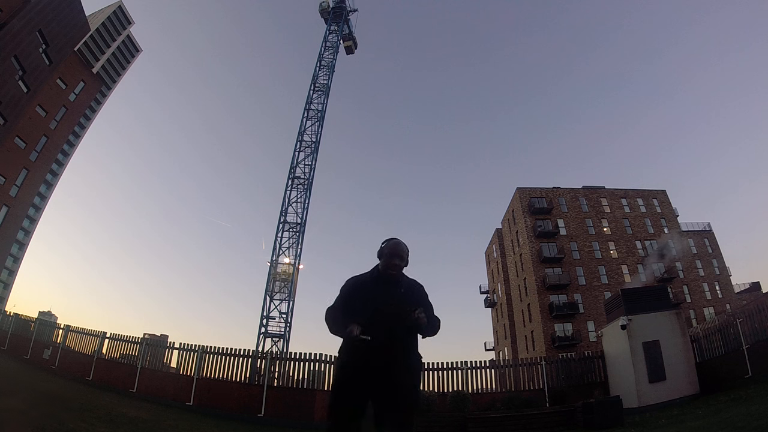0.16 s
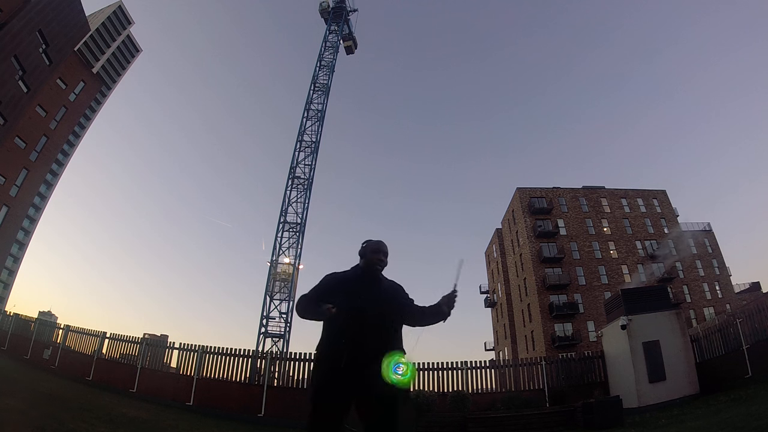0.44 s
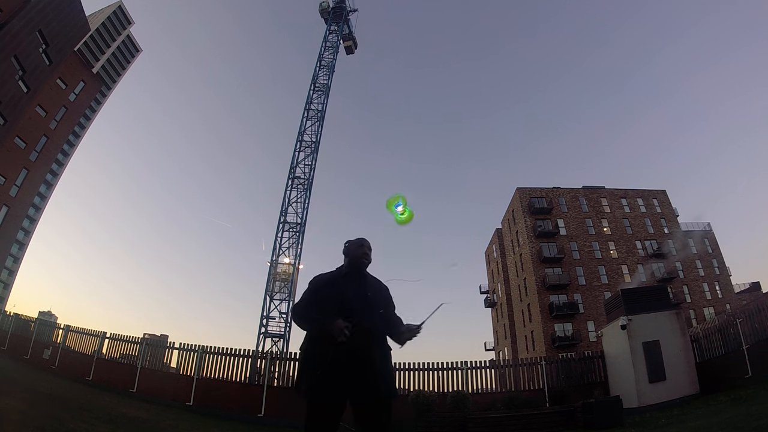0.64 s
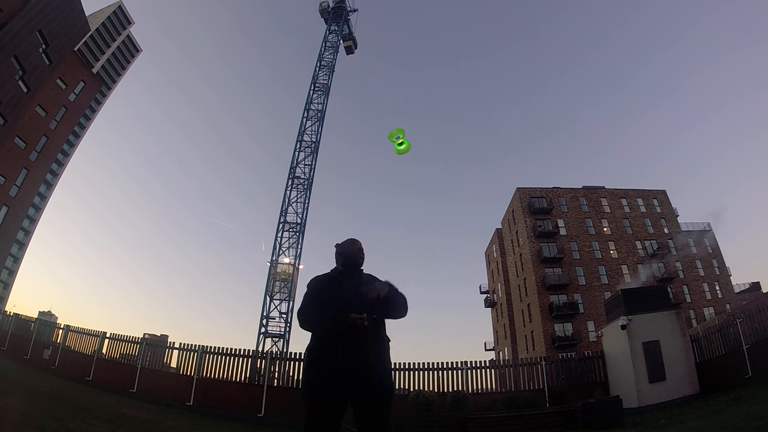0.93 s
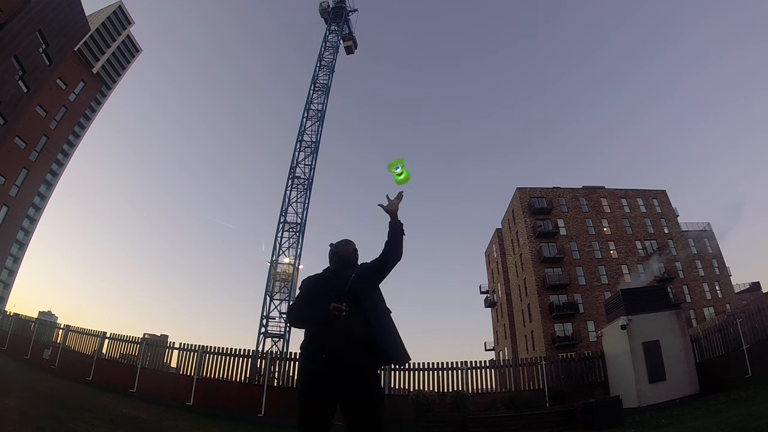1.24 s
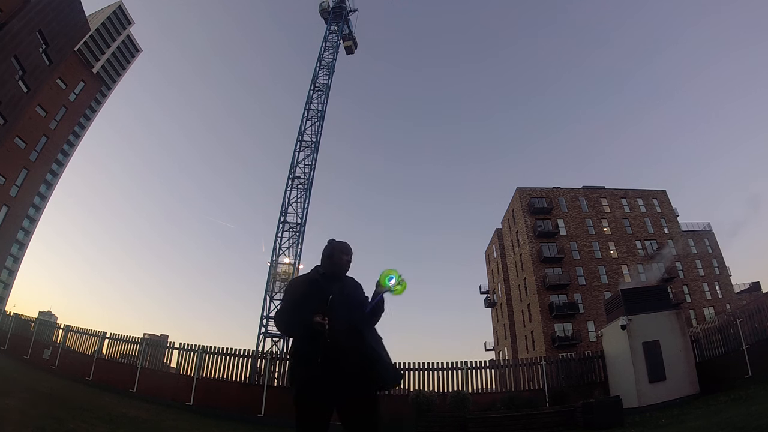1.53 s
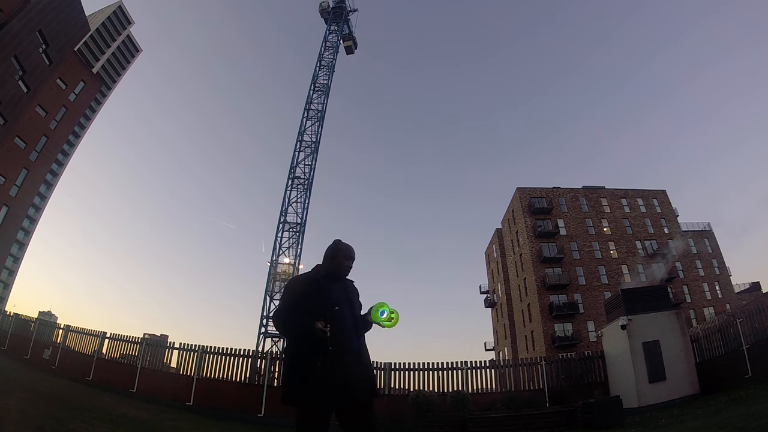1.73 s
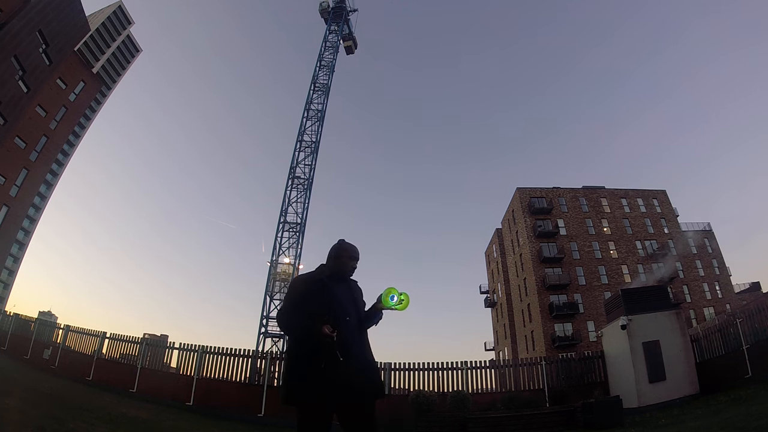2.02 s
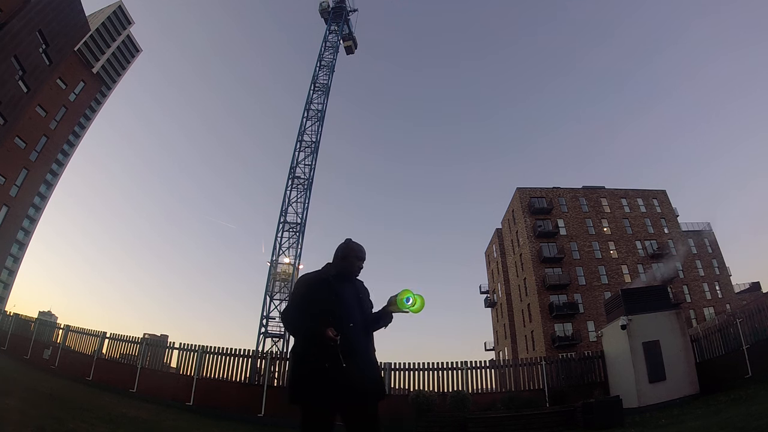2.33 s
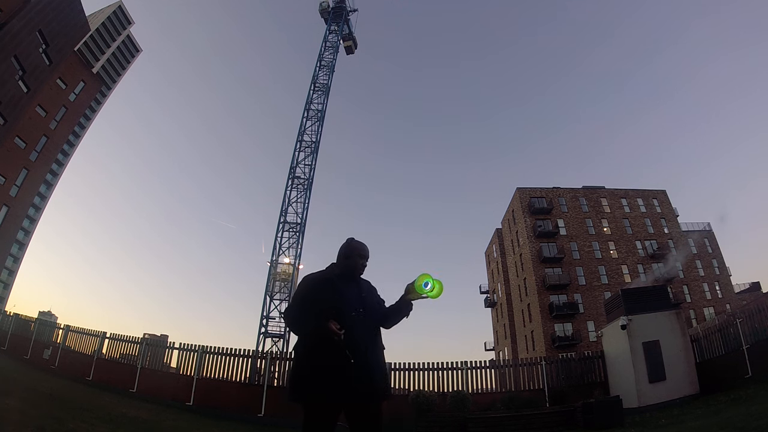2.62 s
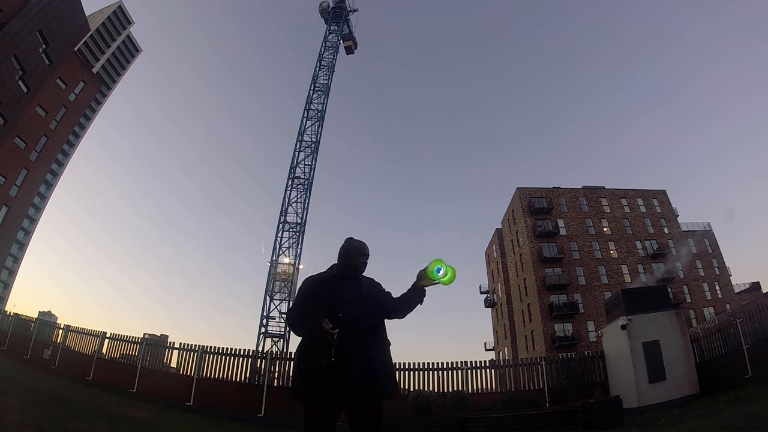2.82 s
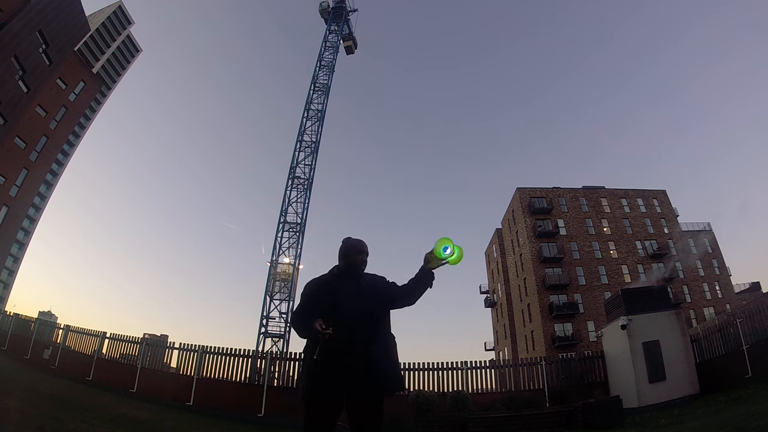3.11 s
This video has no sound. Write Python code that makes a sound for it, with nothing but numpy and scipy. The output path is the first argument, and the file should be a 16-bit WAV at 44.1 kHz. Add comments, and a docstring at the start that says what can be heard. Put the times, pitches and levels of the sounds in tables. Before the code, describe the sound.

A spinning diabolo whirrs on its string, flies up into silence, then whirrs on a finger.

```python
"""Diabolo thrown and caught on a city roof

A ball-bearing diabolo close to the microphone: uneven rolling noise through cup modes and bright resonances.
It whirrs on the string, is flung up, falls silent in the air, and whirrs on again, caught on a finger.
Overtones glide down in the throw, in step with the roof echo; the rolling's overtones sound on the finger.
Stick and string ticks and the catch knocks are filtered bursts; traffic, a hum and hiss are shaped noise."""
import sys
import numpy as np
from scipy import signal
from scipy.fft import rfft, irfft, next_fast_len
from scipy.io import wavfile
from scipy.ndimage import uniform_filter1d, map_coordinates

SR = 44100
rng = np.random.default_rng(int(sys.argv[2]) if len(sys.argv) > 2 else 0)


def persist_wave(psi):
    """Save psi, clipped to +-1, as 16-bit WAV."""
    counts = np.round(np.clip(psi, -1, 1) * 32767).astype(np.int16)
    wavfile.write(sys.argv[1], SR, np.atleast_2d(counts).T)


N = 144207

# The bearing on the string (first list), then from the jerk of the throw into the air (second list).
# Each row: time in seconds, level in dB, low cup modes in dB, bright resonances in dB, sizzle in dB.
THROW_LEVELS = [
    [(0.05, -53, 4.5, -5, -26), (0.076, -49.5, 9.6, -18, -22), (0.084, -57.5, 16.7, -12, -16),
     (0.128, -52, 6.5, -14, -25), (0.15, -61, 16, -5, -26), (0.165, -45, 2.1667, -7, -22),
     (0.196, -48.5, 6.6, -9, -28), (0.24, -60, 8.5, -5, -15), (0.304, -58.5, 10, -14, -25),
     (0.32, -60, 6, -5, -24), (0.34, -65.5, 19, -13, -14), (0.362, -56, 3.6, -6, -21)],
    [(0.375, -41, 14, -6, -12), (0.387, -36, -6, -4.5, -8.5), (0.421, -40, 11, -2, -13),
     (0.431, -42.5, 1, -4, -8), (0.441, -35.5, 2, 4.5, -5.5), (0.477, -38.5, -1, -1.5, -11),
     (0.507, -38.5, 3.5, -9.5, -18.5), (0.545, -43.5, 10.5, -5, -16), (0.579, -46.5, 11, -5, -17),
     (0.779, -57, 14.5, -5, -19), (0.81, -56.5, 11.5, -3, -10), (0.891, -73.5, 18.5, -3, -15),
     (0.909, -64.5, 12, -5, -8), (1.0, -95, 4, 14, 2), (1.1, -88, 6, 23, 7), (1.25, -92, 6, 3, 0)],
]
# The bearing on the finger. Each row: the same columns as above.
FINGER_LEVELS = [(1.39, -90, 2, -1, -4), (1.404, -74.5, 23, -10, -18), (1.436, -42, 1.5, -6.5, -24),
                 (1.504, -47.5, 6.5, 1.5, -15), (1.53, -45, 2, -0.5, -21), (1.582, -45, 2, -6, -14),
                 (1.65, -44, -0.5, -5, -17), (1.672, -47, 3.5, -3, -11.5), (1.934, -50, 8.5, -0.5, -8),
                 (1.938, -46.5, 0, -2, -13), (2.038, -46, 10, -4.5, -14), (2.07, -43, 1.5, -11.5, -21),
                 (2.122, -47, 9, -6, -19), (2.222, -45, 2.5, -8, -27.5), (2.248, -53, 15.5, 0, -13),
                 (2.264, -46, 0, -7, -23), (2.3, -46.5, 8, -5.5, -22), (2.47, -47, 8, -5, -20),
                 (2.53, -47, 3, -6, -21), (2.73, -47.5, 7.5, -4.5, -19), (2.808, -47, -1.5, -4.5, -18),
                 (2.86, -47, 5.5, -5.5, -22), (3.018, -49, 9, -5, -19), (3.238, -46, 5.5, -4.5, -25),
                 (3.27, -44.5, 7, -9, -26)]
# Spacing of the overtones: gliding down in the throw, in step with the roof echo, then on the finger.
# Each row: time in seconds, spacing in Hz, level over the rolling noise in dB.
OVERTONE_GLIDES = [
    [(.37, 455, -23), (.44, 440, -10.5), (.5, 398, -10), (.55, 345, 6), (.6, 300, -7), (.65, 255, -5),
     (.7, 222, 0.5), (.76, 198, 0), (.9, 170, 3.5)],
    [(1.45, 259.8, -1.5), (1.75, 248.8, 0), (1.91, 240, -2.5), (1.95, 237, 3), (2.06, 214, -1),
     (2.2, 209.8, -12), (2.25, 224, 0), (2.36, 221.3, -4.5), (2.5, 219.4, -1), (2.6, 219.6, -6),
     (2.9, 218.2, 0), (2.97, 216, -11), (3.25, 215.5, -5)],
]


def diabolo():
    """The bearing rolls on the string, falls silent in the air, and rolls again on the finger."""
    throw_overtones = gliding_overtones(OVERTONE_GLIDES[0], sixth_db=3)
    finger_overtones = gliding_overtones(OVERTONE_GLIDES[1], sixth_db=2.5)
    on_string = bearing(THROW_LEVELS[0], 0)
    in_air = bearing(THROW_LEVELS[1], throw_overtones)
    on_finger = bearing(FINGER_LEVELS, finger_overtones)
    return on_string + in_air + on_finger


# Low modes of the plastic cups. Each row: centre in Hz, width in Hz, relative level in dB.
CUP_LOW_MODES = [(690, 1200, -24.5), (1099, 204, -4), (1299, 147, 10.5), (1585, 483, -1.5)]
# Upper modes of the plastic cups. Each row: centre in Hz, width in Hz, relative level in dB.
CUP_UPPER_MODES = [(1910, 222, 3), (2450, 1240, -8), (3093, 334, -3)]
# Bright upper resonances, around 5 to 7 kHz. Each row: centre in Hz, width in Hz, relative level in dB.
BRIGHT_MODES = [(4740, 1350, 1.5), (5590, 325, 15), (6830, 1240, -8.5)]
# Top of the rolling noise, passed twice. Each row: centre in Hz, width in Hz, relative level in dB per pass.
SIZZLE_BANDS = [(6690, 2040, 8), (9780, 1300, 5.5)]
TURNS_HZ, TURN_DEPTH = 50.87, 0.12  # the axle is a little out of round
ROUGH_DB, ROUGH_PER_S = -1.5, 66  # uneven rolling: dB per unit of the random curve, knots a second


def bearing(rows, overtones):
    """Uneven noise, throbbing once a turn, drives cups and bright resonances; overtones drive the cups."""
    s, *columns = np.transpose(rows)
    t = np.arange(N) / SR
    level_db, low_db, bright_db, sizzle_db = [np.interp(t, s, column) for column in columns]
    throb = 1 + TURN_DEPTH * np.sin(2 * np.pi * TURNS_HZ * t)
    rolling = amp(ROUGH_DB * wobble(ROUGH_PER_S)) * throb * rng.standard_normal(N)
    drive = echoed(rolling) + overtones

    def cup_ring(modes):
        """Resonances driven by rolling and overtones, scaled by their response to the rolling alone."""
        return ringing(drive, modes) / np.std(ringing(rolling, modes))

    cups = amp(-3.5) * (cup_ring(CUP_UPPER_MODES) + amp(low_db) * cup_ring(CUP_LOW_MODES))
    bright = amp(bright_db) * unit(ringing(rolling, BRIGHT_MODES))
    sizzle = amp(sizzle_db) * unit(ringing(ringing(rolling, SIZZLE_BANDS), SIZZLE_BANDS))
    sounding = (t >= s[0]) & (t <= s[-1])
    return sounding * amp(level_db) * (cups + bright + sizzle)


WAVER_DB, WAVER_PER_S = 3, 14  # each overtone swells on its own: dB per unit of curve, knots a second
DRIFT_RAD, DRIFT_PER_S = 0.15, 30  # phase drift, multiplied by the overtone number; knots a second
CLEAREST_HZ, PALER_DB_PER_KHZ = 1510, 4  # where the overtones stand out most, and their fall to each side


def gliding_overtones(rows, sixth_db):
    """Overtones 3 to 16 of a gliding rate, as dense in power as white noise of rms 1 before the row levels."""
    s, hz, db = np.transpose(rows)
    t = np.arange(N) / SR
    rate = np.interp(t, s, hz)
    turn = 2 * np.pi * np.cumsum(rate) / SR
    stack = np.zeros(N)
    for k in range(3, 17):
        paler_db = PALER_DB_PER_KHZ * abs(k * rate - CLEAREST_HZ) / 1000
        level_db = WAVER_DB * wobble(WAVER_PER_S) + sixth_db * (k == 6) - paler_db
        phase = k * (turn + k + DRIFT_RAD * wobble(DRIFT_PER_S))
        stack += amp(level_db) * np.sin(phase)
    return amp(np.interp(t, s, db)) * np.sqrt(4 * rate / SR) * stack


# Echo off the roof, later the higher the toy. Each row: time in seconds, delay in ms.
ROOF_DELAYS = [(0, 2.2), (.37, 2.1), (.44, 2.27), (.5, 2.51), (.55, 2.9), (.65, 3.9), (.76, 5.05),
               (.9, 5.9), (1.3, 3.4), (1.45, 2.6), (1.6, 2.2), (1.7, 2.0), (1.85, 2.08), (2.1, 2.18),
               (2.3, 2.08), (2.45, 2.2), (2.63, 2.42), (2.87, 2.55), (3.05, 2.68), (3.27, 2.72)]
ROOF_DB = 2.5  # echo over the direct sound


def echoed(x):
    """x straight and off the roof with a gliding delay, scaled to keep the power."""
    n = np.arange(N)
    delay_ms = np.interp(n / SR, *np.transpose(ROOF_DELAYS))
    late = map_coordinates(x, [n - delay_ms * SR / 1000])
    return (x + amp(ROOF_DB) * late) / np.sqrt(1 + amp(ROOF_DB) ** 2)


# Ticks of stick and string, and the knocks of the catch at 1.41 and 1.43 s.
# Each row: start in seconds, crack level in dB before its band filter, crack pitch in Hz,
# knock level in dB before a common lift and the cups, t60 of the knock burst in seconds.
TICK_EVENTS = [(0.1608, -40, 9000, -31, 0.037), (0.1635, -32, 5740, -35.5, .03),
               (0.2455, -40.5, 6200, -51, .03), (0.3747, -28, 6470, -37, 0.017),
               (0.4300, -44, 5800, -21.5, 0.027), (0.7860, -31.5, 6000, -32.5, 0.023),
               (0.8115, -43, 5800, -62, .02), (0.8555, -46, 6000, -57, .02),
               (1.4110, -62, 5800, -43, 0.045), (1.4311, -33, 5630, -27, 0.041)]
# Band of the crack, passed three times. Each row: centre in Hz, width in Hz, level in dB per pass.
CRACK_BAND = [(7150, 5400, 0.5)]
# Fixed roof echoes, from hand height. Each row: delay in ms, level in dB.
HAND_ECHOES = [(2.3, -3), (5.0, -10)]
CRACK_T60_S, CRACK_NOISE = 0.005, 0.34  # decay of the crack burst; noise beside its sine
KNOCK_LIFT_DB = 7.0


def ticks_and_catch():
    """Ticks and catch knocks: a thin crack plus a noise burst that rings the cups, both echoed off the roof."""
    crack, knock, t = np.zeros(N), np.zeros(N), np.arange(2000) / SR
    for s, crack_db, hz, knock_db, knock_t60 in TICK_EVENTS:
        start = round(s * SR)
        snap = np.sin(2 * np.pi * hz * t) + CRACK_NOISE * rng.standard_normal(len(t))
        crack[start:][:len(t)] += amp(crack_db - 60 * t / CRACK_T60_S) * snap
        thud = rng.standard_normal(len(t))
        knock[start:][:len(t)] += amp(knock_db + KNOCK_LIFT_DB - 60 * t / knock_t60) * thud
    for _ in range(3):
        crack = ringing(crack, CRACK_BAND)
    direct = crack + ringing(knock, CUP_LOW_MODES) + amp(-6.5) * ringing(knock, CUP_UPPER_MODES)
    echoes = sum(amp(db) * np.roll(direct, round(ms * SR / 1000)) for ms, db in HAND_ECHOES)
    return direct + echoes


# Spectrum of the distant traffic. Each row: frequency in Hz, relative density in dB per Hz.
TRAFFIC_SPECTRUM = [(20, -38), (50, -23.5), (62, -35), (90, -29), (100, -34), (114, -49), (130, -10),
                    (150, -1.5), (210, -5), (300, -12), (400, -19.5), (600, -22.5), (950, -17.5),
                    (1300, -22.5), (1800, -27.5), (2300, -83)]
# Spectrum of the far hiss. Each row: frequency in Hz, relative density in dB per Hz.
HISS_SPECTRUM = [(1200, -15), (1800, 8.5), (2500, -3.5), (3300, -8.5), (4300, -17.5), (4900, -13),
                 (5600, -5), (7000, -4.5), (9500, -8), (11500, -15), (13000, -17), (15300, -22)]
TRAFFIC_DB, HISS_DB, HUM_DB = -44.5, -60, -54
HUM_HZ, HUM_WIDTH_HZ = 150, 8


def city():
    """Far off: slowly swelling traffic rumble, a wavering hum of narrow noise, and soft hiss."""
    rumble = amp(TRAFFIC_DB + 1.7 * wobble(3.59)) * rush(TRAFFIC_SPECTRUM, patchy_db=1.0)
    hiss = amp(HISS_DB) * rush(HISS_SPECTRUM, patchy_db=0.4)
    narrow = filtered(rng.standard_normal(N), lambda hz: np.exp(-((hz - HUM_HZ) / HUM_WIDTH_HZ) ** 2))
    return rumble + amp(HUM_DB) * unit(narrow) + hiss


def rush(spectrum, patchy_db):
    """Coloured noise of rms 1 with patches of random gain over time and frequency."""
    z = signal.stft(rng.standard_normal(N), nperseg=512)[2]
    over_frequency = uniform_filter1d(rng.standard_normal(z.shape), 6, 0)
    patches = unit(uniform_filter1d(over_frequency, 14, 1))
    x = signal.istft(z * amp(patchy_db * patches), nperseg=512)[1][:N]
    f, db = np.transpose([(1, -120)] + list(spectrum) + [(SR / 2, -120)])
    return unit(filtered(x, lambda hz: amp(np.interp(np.log(hz + 1), np.log(f), db))))


def ringing(x, modes):
    """x through parallel resonances of alternating sign."""
    def response(f):
        """Sum of the band-pass resonances."""
        return sum((-1) ** k * amp(db) * 1j * f * width / (centre * centre - f * f + 1j * f * width)
                   for k, (centre, width, db) in enumerate(modes))
    return filtered(x, response)


def filtered(x, response):
    """x times a complex response of frequency, padded so that tails do not wrap round."""
    m = next_fast_len(N + SR // 2)
    return irfft(rfft(x, m) * response(np.fft.rfftfreq(m, 1 / SR)), m)[:N]


def wobble(rate):
    """A smooth random curve, rate knots a second (at most 199)."""
    knots = rng.standard_normal(int(N / SR * 200) + 4)
    return map_coordinates(knots, [np.arange(N) * min(rate, 199) / SR])


def unit(x):
    """Scale to rms 1."""
    return x / np.sqrt(np.mean(x ** 2) + 1e-20)


def amp(db):
    """dB to gain."""
    return 10 ** (np.asarray(db) / 20)


def scene():
    """Toy, ticks, catch and city at one microphone."""
    return (diabolo() + ticks_and_catch() + city())[None]


START_S, FADE_S = 0.036, 0.013  # silent until the start, then a short fade-in
TOP_HZ = 15300  # band limit


def record(dry):
    """A short fade-in, and nothing above the band limit."""
    fade = np.clip((np.arange(N) / SR - START_S) / FADE_S, 0, 1)
    return filtered(dry[0] * fade, lambda hz: hz < TOP_HZ)[None]


dry = scene()
out = record(dry)
persist_wave(out)
```